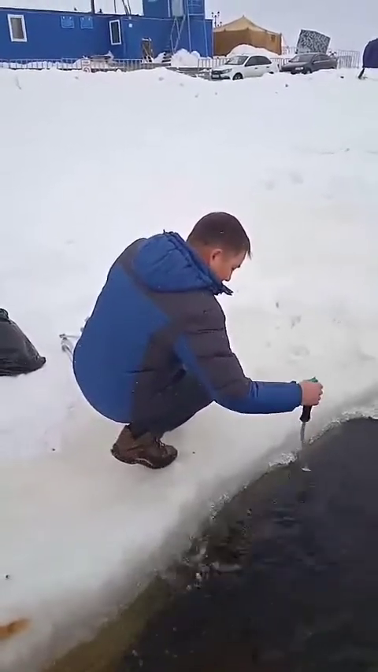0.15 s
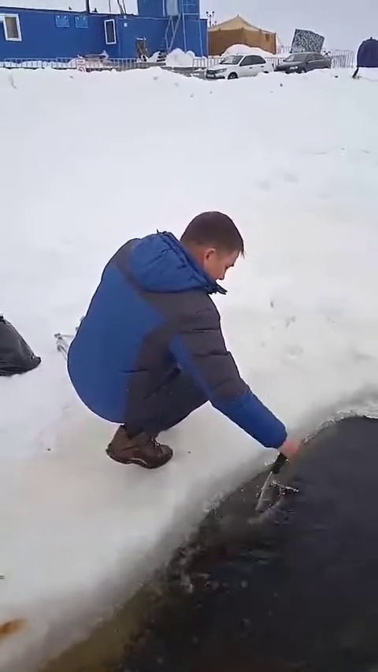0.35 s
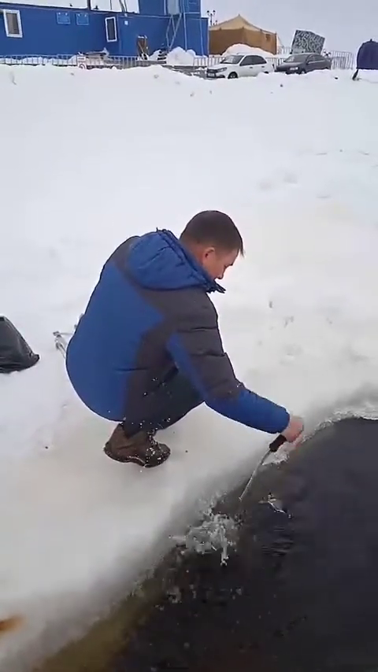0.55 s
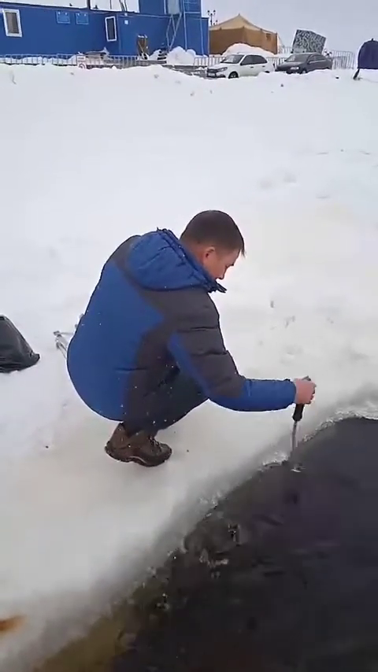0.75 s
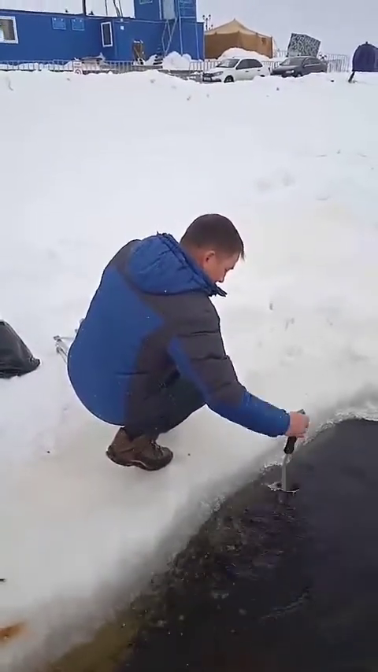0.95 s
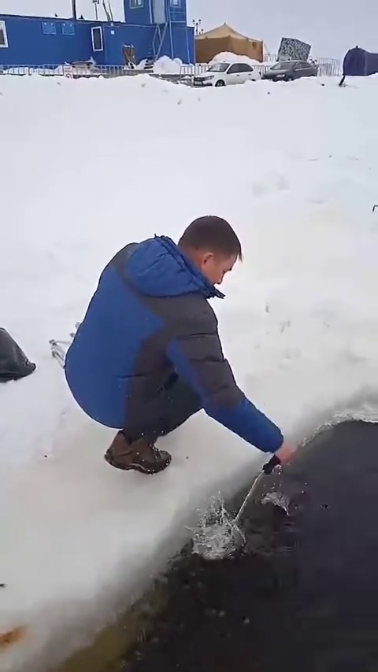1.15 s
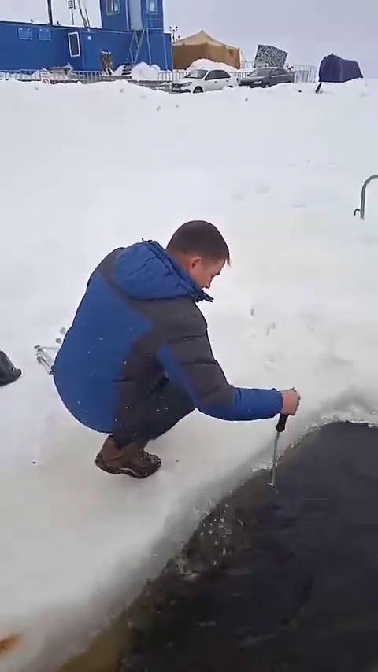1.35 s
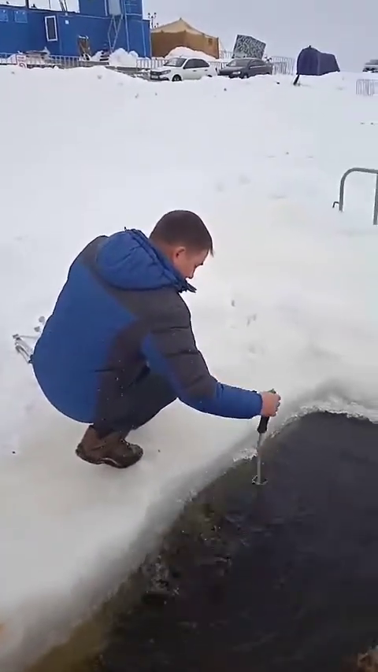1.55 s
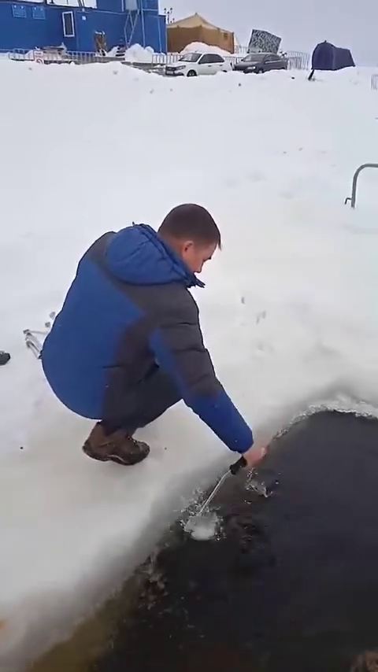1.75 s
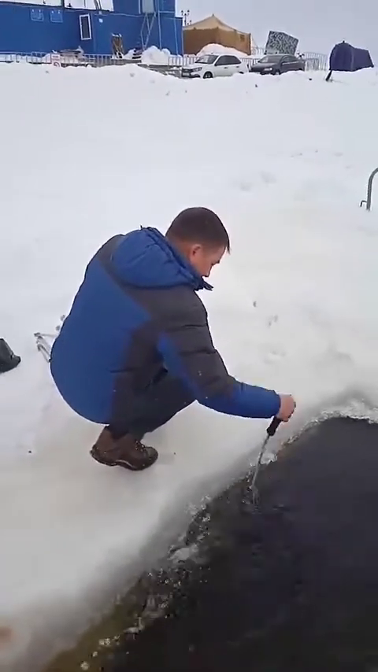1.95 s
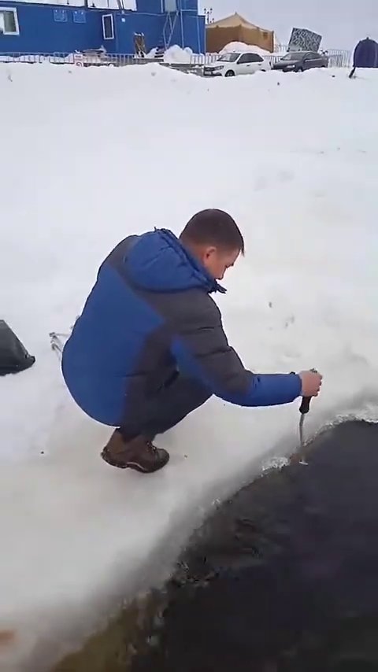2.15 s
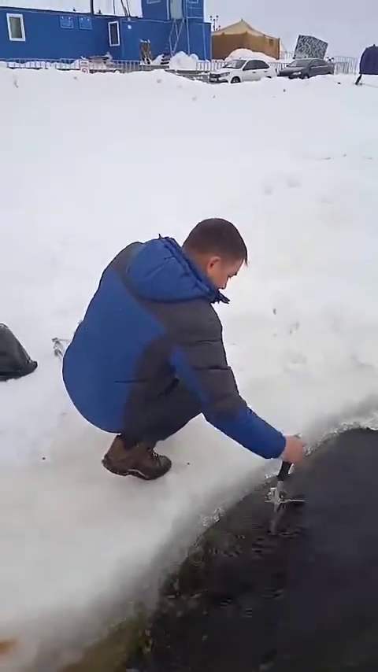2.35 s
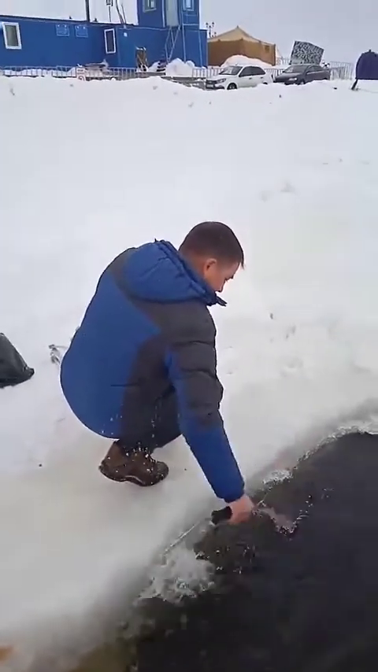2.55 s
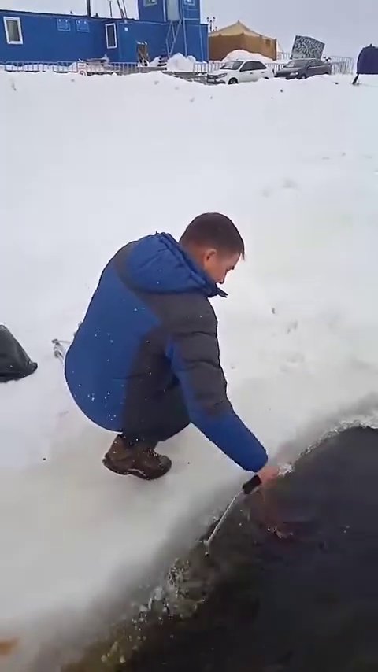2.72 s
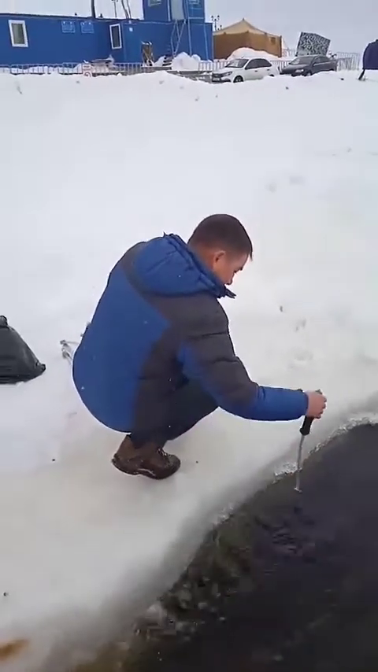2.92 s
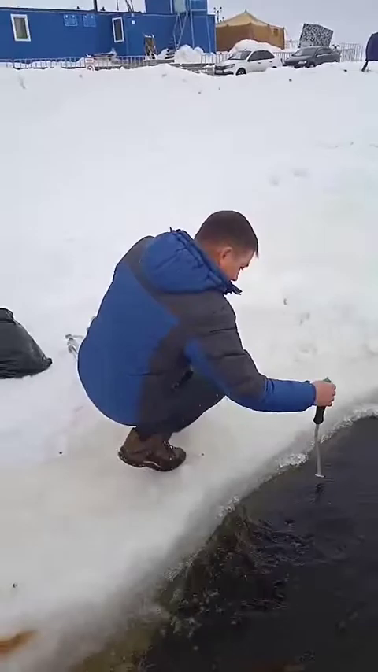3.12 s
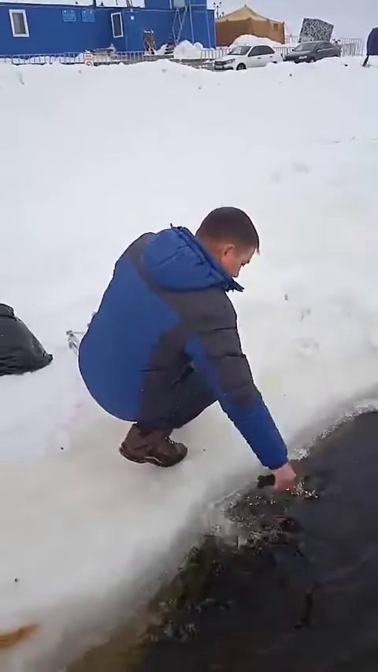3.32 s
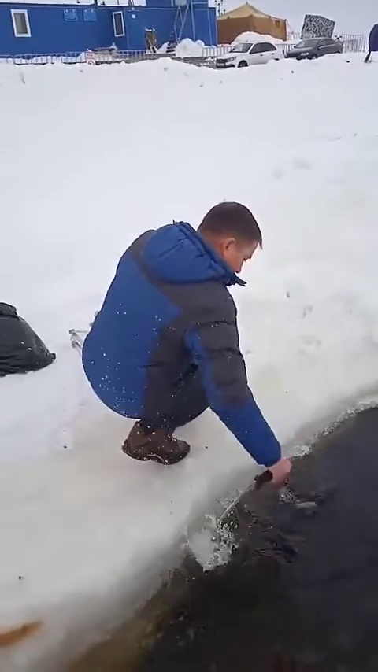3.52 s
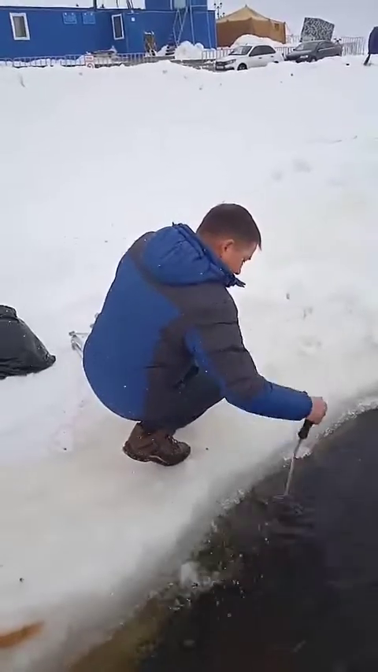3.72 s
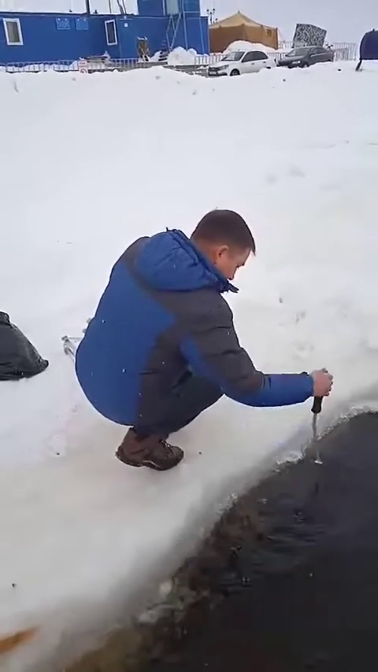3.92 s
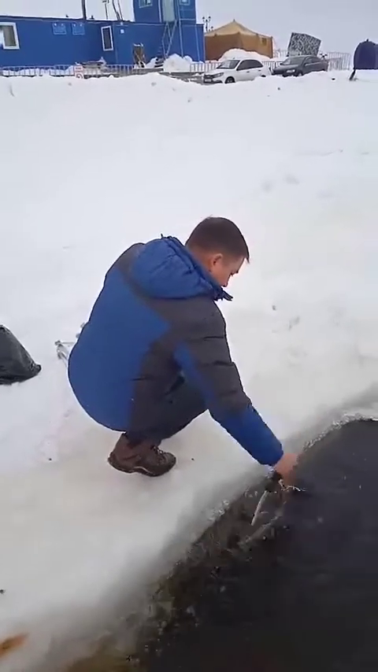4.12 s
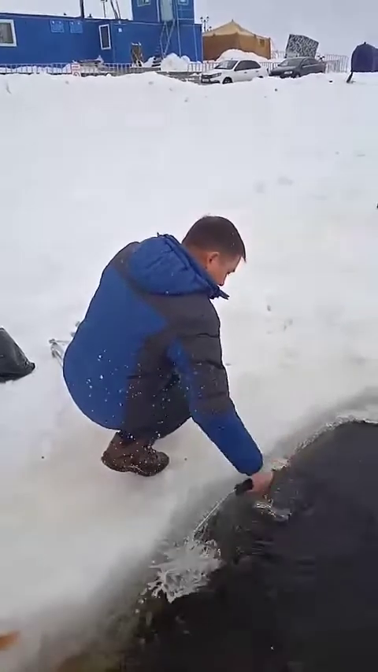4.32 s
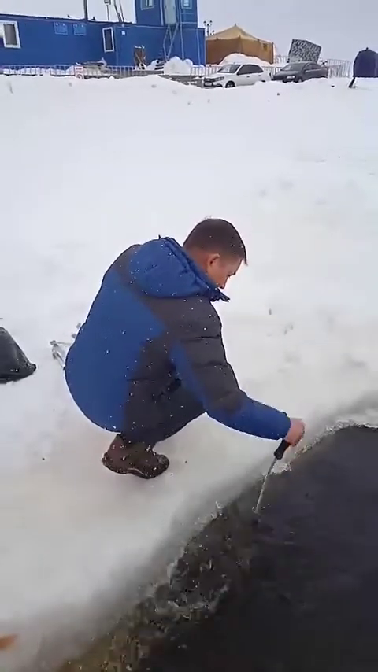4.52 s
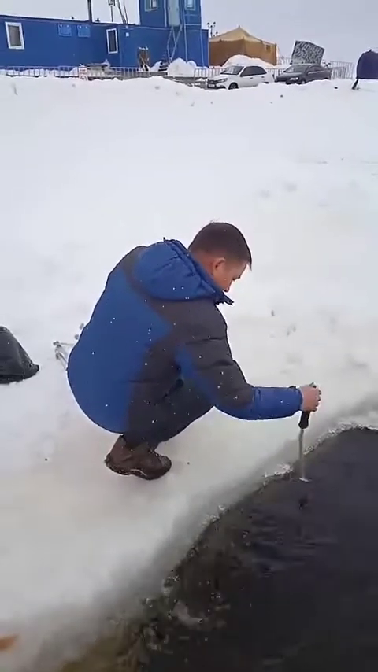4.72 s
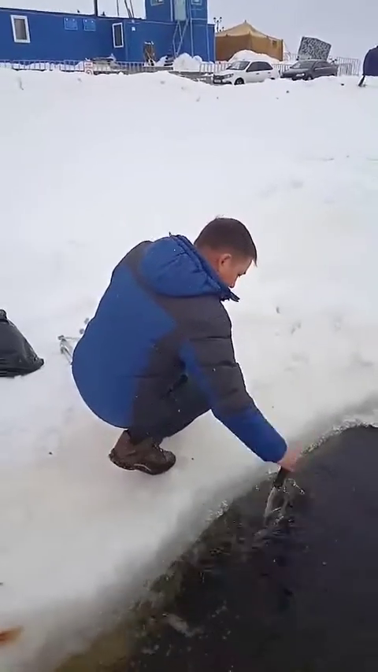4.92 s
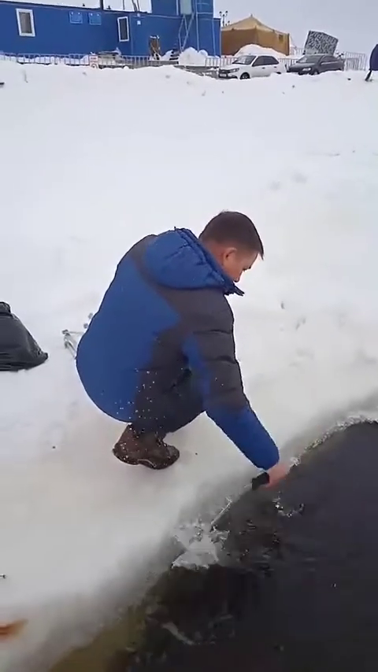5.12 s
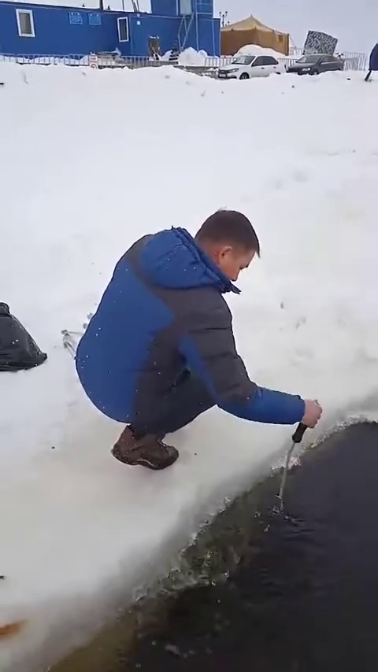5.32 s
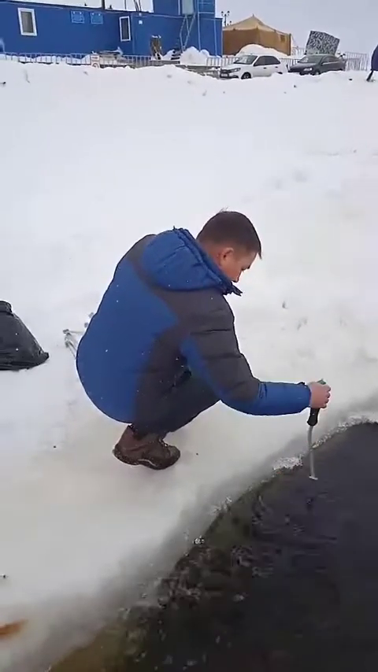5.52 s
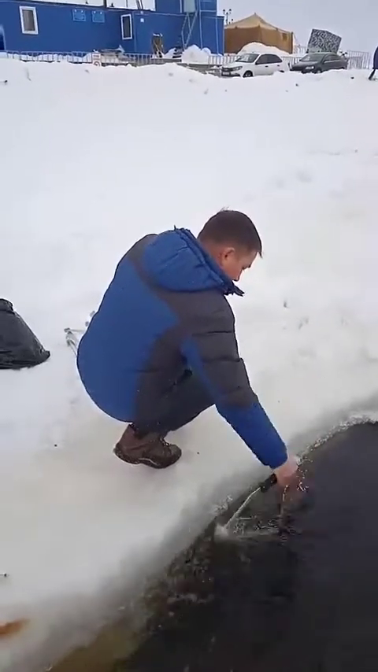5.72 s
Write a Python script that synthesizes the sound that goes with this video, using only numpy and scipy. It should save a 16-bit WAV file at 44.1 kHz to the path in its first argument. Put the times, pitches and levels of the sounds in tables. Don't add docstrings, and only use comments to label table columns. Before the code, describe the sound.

Outdoors by a snowy bank, a cupped metal rod sweeps through open water seven times, a little under a second apart. Each stroke gives a soft slap and a loud, short, hollow bloop that climbs in pitch, followed by light splash, hiss, drips and ticks on ice. A phone close by catches faint distant hum and wind puffs, ending in a buffeting gust.

```python
import sys
import numpy as np
from scipy import signal
from scipy.fft import rfft, irfft, next_fast_len
from scipy.io import wavfile

SR = 44100
rng = np.random.default_rng(int(sys.argv[2]) if len(sys.argv) > 2 else 0)


def wrap_up_sound(samples):
    columns = np.atleast_2d(samples).T
    tamed = np.clip(columns, -1, 1)
    steps = np.round(tamed * 32767).astype(np.int16)
    wavfile.write(sys.argv[1], SR, steps)


def convert_level_to_amplitude(level_db):
    exponent = np.asarray(level_db, float) / 20
    return 10 ** exponent


N = 254456


def rms_one(x):
    return x / np.sqrt(np.mean(x ** 2) + 1e-20)


def in_time(rows):
    s, level = np.transpose(rows)
    return np.interp(np.arange(N) / SR, s, level)


def add(out, s, piece):
    i = max(round(s * SR), 0)
    out[i:i + len(piece)] += piece[:N - i]


def colour(x, spectrum):
    hz, db = np.transpose(spectrum)
    size = next_fast_len(len(x))
    bins = np.arange(size // 2 + 1) * SR / size + 1
    gain_db = np.interp(np.log(bins), np.log(hz), db, left=-70, right=-70)
    return irfft(rfft(x, size) * convert_level_to_amplitude(gain_db), size)[:len(x)]


def drift(rate_hz):
    r = np.exp(-2 * np.pi * rate_hz / SR)
    slow = signal.lfilter([1], [1, -2 * r, r * r], rng.standard_normal(N + SR))
    return rms_one(slow[SR:])


def decay(t, t60):
    return convert_level_to_amplitude(-60 * t / t60)


def ring(t, hz, t60, rise=0.):
    return decay(t, t60) * np.sin(2 * np.pi * hz * t * (1 + rise * t / t60))


def soft_start(t, rise_s):
    return np.sin(np.pi / 2 * np.minimum(t / rise_s, 1)) ** 2


# (pinch-off [s], start [Hz], final [Hz], glide [s])
CAVITY_PITCH = [
    (0.4345, 138, 900, 0.0533),
    (1.0944, 134, 471, 0.0123),
    (1.7305, 112, 593, 0.0374),
    (2.4794, 87, 410, 0.0188),
    (3.3698, 151, 346, 0.006),
    (4.2083, 185, 738, 0.0547),
    (5.0195, 91, 683, 0.0397),
]
# (peak [dB], rise [s], hold [s], t60 [s])
CAVITY_SWELL = [
    (-8.2, .0148, .022, .02),
    (-12.1, .0044, .0164, .02),
    (-11.8, .0147, .0294, .0389),
    (-10.2, .006, .0072, .0895),
    (-10.4, .0026, .0166, .0327),
    (-8, .0038, .0239, .02),
    (-12.7, .0118, .02, .0299),
]
# (time [s], level [dB], pitch [Hz], t60 [s])
LAST_BUBBLES = [
    (.4616, -15, 462, .03),
    (1.1128, -23.3, 458, .045),
    (1.7688, -21.5, 475, .027),
    (2.514, -33, 372, .085),
    (3.3915, -26, 350, .12),
    (4.2361, -17.5, 404, .021),
    (5.0438, -22.3, 398, .046),
]


def cavity():
    out, t = np.zeros(N), np.arange(SR // 6) / SR
    knee_s = .003
    for (s, start_hz, final_hz, glide), (db, rise, hold, t60) in zip(CAVITY_PITCH, CAVITY_SWELL):
        turns = final_hz * t - (final_hz - start_hz) * glide * (1 - np.exp(-t / glide))
        fade_db = -60 * knee_s / t60 * np.logaddexp(0, (t - hold) / knee_s)
        add(out, s, -convert_level_to_amplitude(db + fade_db) * soft_start(t, rise) * np.sin(2 * np.pi * turns))
    for s, db, hz, t60 in LAST_BUBBLES:
        add(out, s, convert_level_to_amplitude(db) * ring(t, hz, t60) * soft_start(t, .005))
    return out


# (time [s], peak [dB], low push [dB], fine spray relative to coarse [dB])
SLAPS = [
    (0.4315, -34.5, -24, -4),
    (1.0849, -35, -19, -2),
    (1.729, -34.5, -18, 0),
    (2.4664, -30, -20.5, -6),
    (3.35, -33.5, -17, -1),
    (4.1977, -34.5, -25, -7.5),
    (5.0071, -31, -22, -3),
]


def slaps():
    out, coarse, fine = np.zeros((3, N))
    t = np.arange(SR // 4) / SR
    for s, db, push_db, fine_db in SLAPS:
        add(out, s, -convert_level_to_amplitude(push_db) * ring(t, 150, 0.023) * np.minimum(t / 0.001943, 1))
        burst = convert_level_to_amplitude(db - 11.5) * (decay(t, 0.019) + 0.3 * decay(t, 0.37)) * np.minimum(t / 0.0031, 1)
        add(coarse, s, burst)
        add(fine, s, convert_level_to_amplitude(fine_db) * burst)
    return out, coarse, fine


# (time [s], peak [dB], air column [Hz], its level [dB], fine spray relative to coarse [dB])
CLOSINGS = [
    (0.4414, -55.5, 894, -52, -10.5),
    (1.0967, -40, 876, -42.5, -10),
    (1.7328, -33.5, 857, -42.5, -16),
    (2.4818, -40, 677, -32.5, -2.5),
    (3.3632, -42, 753, -43, 0.5),
    (4.2085, -55, 798, -48.5, 5),
    (5.0218, -38, 738, -33.5, -5.5),
]
# (frequency ratio, level [dB], t60 [s])
AIR_MODES = [
    (0.998, 8.5, .06),
    (1.759, -3, .04),
    (2.499, -20.5, .035),
    (3.252, -22.5, .03),
]


def closings():
    out, coarse, fine = np.zeros((3, N))
    t = np.arange(SR // 4) / SR
    for s, db, hz, column_db, fine_db in CLOSINGS:
        for ratio, mode_db, t60 in AIR_MODES:
            add(out, s, convert_level_to_amplitude(column_db + mode_db) * ring(t, hz * ratio, t60, 0.048) * np.minimum(t / .004, 1))
        burst = convert_level_to_amplitude(db - 3.5) * (decay(t, 0.059) + 0.17 * decay(t, 0.17)) * np.minimum(t / 0.0017, 1)
        add(coarse, s, burst)
        add(fine, s, convert_level_to_amplitude(fine_db) * burst)
    return out, coarse, fine


# (time [s], peak [dB], spread [s], fine hiss relative to coarse [dB])
LANDINGS = [
    (.05, -72.5, 0.13, -2),
    (.7, -68.5, 0.084, -5),
    (1.35, -67, 0.11, -4.5),
    (1.712, -64, 0.025, -9),
    (1.99, -66, 0.14, -5),
    (2.78, -61, 0.12, -1),
    (3.69, -64, 0.1, -4),
    (4.48, -67.5, 0.11, -2),
    (5.34, -59, 0.071, -3.5),
]


def falling():
    t = np.arange(N) / SR
    coarse, fine = np.full(N, convert_level_to_amplitude(-80)), np.full(N, convert_level_to_amplitude(-81.5))
    for s, db, spread, fine_db in LANDINGS:
        runoff_starts = 1 / (1 + np.exp(np.minimum((s - t) / .02, 50)))
        draining = convert_level_to_amplitude(-13.5) * decay(np.abs(t - s), 1) * runoff_starts
        shower = convert_level_to_amplitude(db) * (np.exp(-((t - s) / spread) ** 2) + draining)
        coarse += shower
        fine += convert_level_to_amplitude(fine_db) * shower
    wake_s, edge_s = 0.073, 0.011
    for s, db, _, fine_db in SLAPS:
        wake = convert_level_to_amplitude(db - 35) * (t > s) / (1 + np.exp(np.minimum((t - s - wake_s) / edge_s, 50)))
        coarse += wake
        fine += convert_level_to_amplitude(fine_db - 1.5) * wake
    return coarse, fine


def patter(spectrum, low_hz, high_hz, per_s, cycles, grain_db, flicker_db):
    sizes = convert_level_to_amplitude(3.0 * np.minimum(rng.exponential(1, N), 4)) * rng.choice([-1, 1], N)
    born = rng.random(N) < per_s * convert_level_to_amplitude(5.0 * drift(15)) / SR
    dealt = np.where(born, rng.integers(0, 14, N), -1)
    white = rng.standard_normal((2, N))
    together, out = drift(34), 0
    for k, hz in enumerate(np.geomspace(low_hz, high_hz, 14)):
        w = 2 * np.pi * hz / SR
        bubble, strip = convert_level_to_amplitude(-60 * hz / (cycles * SR)), np.exp(-.1 * w)
        hits = sizes * (dealt == k) + 1e-18
        grains = signal.lfilter([np.sin(w)], [1, -2 * bubble * np.cos(w), bubble ** 2], hits)
        bed = signal.lfilter([1, 0, -1], [1, -2 * strip * np.cos(w), strip ** 2], white[k % 2])
        flicker = convert_level_to_amplitude(flicker_db * (.6 * together + 1.3 * drift(25)))
        out = out + np.sqrt(hz) * (rms_one(bed) * flicker + convert_level_to_amplitude(grain_db) * rms_one(grains))
    return rms_one(colour(out, spectrum))


# (frequency [Hz], level [dB per Hz])
SPLASH_SPECTRUM = [(530, -27), (900, -0.5), (1070, -15), (1220, -4), (1550, -2.5), (1880, -1), (2590, -3),
                   (3470, -15), (3900, -17), (5070, -40.5), (8580, -120)]
# (frequency [Hz], level [dB per Hz])
HISS_SPECTRUM = [(2180, -49), (3700, -52), (4110, -6.5), (5370, -3.5), (6710, -3.5), (9150, -25.5),
                 (10200, -16.5), (13500, -24.5), (15100, -5.5), (15900, -10), (16300, -27.5)]


def spray(thrown_coarse, thrown_fine):
    falling_coarse, falling_fine = falling()
    coarse = patter(SPLASH_SPECTRUM, 1000, 3800, per_s=110, cycles=30, grain_db=4, flicker_db=3)
    fine = patter(HISS_SPECTRUM, 3700, 16000, per_s=220, cycles=45, grain_db=3, flicker_db=3)
    droplets = (rng.random(N) < 70 / SR) * convert_level_to_amplitude(4 * np.minimum(rng.exponential(1, N), 3))
    spatter = signal.lfilter([1], [1, -decay(1 / SR, .006)], droplets) * rng.standard_normal(N)
    fine = fine + convert_level_to_amplitude(-7) * rms_one(colour(spatter, HISS_SPECTRUM))
    coarse_level = falling_coarse + thrown_coarse * convert_level_to_amplitude(0.83 * drift(300))
    fine_level = falling_fine + thrown_fine * convert_level_to_amplitude(1.1 * drift(200))
    return coarse_level * coarse + fine_level * fine


# (time [s], peak [dB], bubble [Hz])
DRIPS = [(0.5664, -53, 2630), (0.6487, -40.5, 1430), (0.713, -50, 1760), (0.7287, -48.5, 2730),
         (1.3735, -44, 1770), (1.3935, -48, 2000), (1.4184, -47, 2110), (1.665, -52.5, 1315),
         (2.0363, -51.5, 2050), (2.0566, -49, 2130), (2.7725, -44.5, 2410), (2.8602, -42, 1370),
         (3.611, -53, 1270), (3.619, -49, 345), (3.628, -50.5, 854), (3.674, -52, 385), (1.6645, -53, 2400),
         (3.7013, -37.5, 1830), (3.7529, -52, 1770), (3.8102, -46.5, 2600), (4.365, -49, 1800),
         (4.4303, -50, 2420), (4.478, -49, 1320), (4.503, -42.5, 2600), (4.6226, -55.5, 1190),
         (5.1762, -45, 3040), (5.281, -56, 2430), (5.499, -56, 2010)]


def drips():
    out, t = np.zeros(N), np.arange(SR // 16) / SR
    for s, db, hz in DRIPS:
        bubble = ring(t, hz, min(55.0 / hz, .09), 0.017)
        add(out, s, convert_level_to_amplitude(db - 0.5) * bubble * np.minimum(t / 0.00075, 1))
    return out


# (time [s], peak [dB], centre [Hz])
TICKS = [(0.1483, -43, 4070), (0.2924, -43.5, 6260), (0.614, -44, 16100), (0.6477, -46, 5500),
         (0.7578, -45.5, 4500), (0.842, -48.5, 5480), (1.2514, -48, 5430), (1.4318, -38, 5220),
         (1.6541, -43.5, 4350), (1.6904, -45, 6400), (1.7207, -41, 6040), (1.8994, -42, 6500),
         (2.119, -40.5, 5940), (2.772, -44.5, 15300), (2.9718, -38.5, 5800), (3.4505, -46, 15100),
         (3.5706, -47, 5400), (3.6723, -36.5, 5360), (3.7528, -43, 5100), (3.8137, -36, 4270),
         (4.0303, -47, 6070), (4.0718, -48.5, 6900), (4.145, -51.5, 6200), (4.504, -40.5, 4730),
         (4.541, -40.5, 6250), (4.593, -36, 4440), (4.7657, -50, 6000), (5.1815, -41, 5700),
         (5.354, -35.5, 5200), (5.647, -39, 5600)]


def ticks():
    out, t = np.zeros(N), np.arange(SR // 16) / SR
    when, size, pitch = rng.random(size=(26, 3)).T
    strays = zip(when * N / SR, -62 + 9 * size, 4500 + 4500 * pitch)
    for s, db, hz in [*TICKS, *strays]:
        band = signal.butter(3, [hz * .8, min(hz * 1.22, 16200)], "band", fs=SR, output="sos")
        noise = rms_one(signal.sosfilt(band, rng.standard_normal(len(t))))
        add(out, s, convert_level_to_amplitude(db - 5) * noise * decay(t, .012) * np.minimum(t / .001, 1))
    return out


def eddies(rows, cycles):
    out, t = np.zeros(N), np.arange(-SR // 25, SR // 25) / SR
    for s, db, hz in rows:
        band = signal.butter(3, [hz * .5, hz * 1.37], "band", fs=SR, output="sos")
        eddy = signal.sosfilt(band, rng.standard_normal(len(t)))
        burst = eddy * np.exp(-(t * hz / cycles) ** 2)
        add(out, s + t[0] - .001, convert_level_to_amplitude(db) * burst / np.abs(burst).max())
    return signal.sosfilt(signal.butter(4, 420, fs=SR, output="sos"), out)


# (time [s], peak [dB])
SNAPS = [(1.665, -50), (4.518, -43), (4.601, -41.5), (4.876, -48), (4.954, -58), (4.979, -50), (5.108, -39),
         (5.14, -30), (5.349, -40), (5.395, -45), (5.432, -32), (5.616, -51), (5.696, -48), (5.729, -37)]


def snaps():
    out, t = np.zeros(N), np.arange(-SR // 25, SR // 25) / SR
    lowpass = signal.butter(3, 650, fs=SR, output="sos")
    for s, db in SNAPS:
        dull = signal.sosfilt(lowpass, rng.standard_normal(len(t)) * np.exp(-((t - .002) / 0.0027) ** 2))
        add(out, s + t[0], convert_level_to_amplitude(db + 4) * dull / np.abs(dull).max())
    return out


# (time [s], peak [dB], pitch [Hz])
PUFFS = [(0.025, -46.5, 87), (0.224, -45, 106.5), (0.293, -46.5, 142), (0.723, -47.5, 122),
         (1.002, -39, 189), (1.05, -36.5, 129), (1.41, -44.5, 157), (1.52, -37, 228), (1.585, -44.5, 169),
         (1.67, -31.5, 130.6), (2.157, -47.5, 121), (2.313, -35, 102), (2.414, -32.5, 163),
         (2.456, -39, 174), (2.753, -37.5, 138), (2.852, -48.5, 130), (2.955, -49, 106), (3.021, -33, 109),
         (3.164, -34.5, 94), (3.256, -40, 133), (3.442, -26.5, 139), (3.541, -40, 120), (3.672, -45, 146),
         (3.783, -43, 99), (3.853, -33.5, 138), (3.902, -34, 139), (3.94, -29, 163), (4.054, -36, 200),
         (4.261, -35.5, 130), (4.365, -31, 167)]
# (time [s], peak [dB], pitch [Hz])
BUFFETS = [(4.431, -37.5, 120), (4.52, -26, 179), (4.579, -23, 168), (4.603, -26.5, 186),
           (4.677, -33.5, 144), (4.701, -37.5, 230), (4.76, -36, 132), (4.803, -25, 119), (4.834, -28, 164),
           (4.88, -28.5, 153), (4.956, -30, 234), (4.986, -19, 194), (5.112, -21.5, 240),
           (5.149, -22.5, 203), (5.226, -23.5, 188), (5.254, -27, 200), (5.303, -24.5, 196),
           (5.355, -24, 274), (5.396, -27, 232), (5.442, -21, 205), (5.464, -27.5, 136), (5.499, -22, 180),
           (5.604, -29.5, 203), (5.692, -27, 174), (5.729, -16.5, 215), (5.752, -33, 167),
           (5.078, -39, 164), (5.184, -38, 165), (5.622, -33, 292), (5.657, -36, 173)]
# (time [s], level [dB])
WIND_LEVEL = [(0.0, -60), (.45, -67.5), (.75, -56), (.9, -70), (1.08, -42.5), (1.3, -68), (1.72, -52),
              (1.92, -69.5), (2.42, -47.5), (2.75, -60), (3.1, -58), (3.42, -51.5), (3.78, -55), (4.4, -45),
              (4.85, -40.5), (5.45, -37), (5.58, -51.5), (5.77, -27.5)]
# (frequency [Hz], level [dB per Hz])
RUMBLE_SPECTRUM = [(20, -6), (40, 1), (70, 2), (110, 0), (160, -9), (230, -26), (400, -45)]
# (frequency [Hz], level [dB per Hz])
FLUTTER_SPECTRUM = [(90, -22.5), (180, 0.5), (300, -5), (500, -12.5), (900, -37)]


def wind():
    bursts = eddies(PUFFS, cycles=1.77) + eddies(BUFFETS, cycles=1) + snaps()
    wind_db, lumps = in_time(WIND_LEVEL), drift(23)
    rumble = rms_one(colour(rng.standard_normal(N), RUMBLE_SPECTRUM))
    flutter = rms_one(colour(rng.standard_normal(N), FLUTTER_SPECTRUM))
    flutter_db = 1.39 * (wind_db + 37.5) - 46.5 + 6.6 * lumps
    return bursts + rumble * convert_level_to_amplitude(wind_db - 0.5 + 3.2 * lumps) + flutter * convert_level_to_amplitude(flutter_db)


# (time [s], level [dB])
LOAD = [(0.0, -90), (.6, -77), (1.6, -76), (1.9, -70.5), (2.5, -60), (3.19, -62), (3.26, -96), (3.55, -90),
        (4.05, -72.5), (4.77, -70), (5.2, -92), (5.77, -82)]
# (frequency [Hz], level [dB per Hz])
HUM_SPECTRUM = [(150, -30), (280, -11), (420, -4), (640, 0), (900, -6), (1100, -10), (1350, 0), (1650, -5),
                (1900, -20), (2700, -26), (3400, -50)]


def far_hum():
    whine_db = in_time(LOAD)
    drone_db = -71 + .05 * (whine_db + 71.5) + 1.5 * drift(7.5)
    far = colour(rng.standard_normal(N), HUM_SPECTRUM)
    split_hz = 1050
    drone = signal.sosfilt(signal.butter(4, split_hz, fs=SR, output="sos"), far)
    whine = signal.sosfilt(signal.butter(4, split_hz, "high", fs=SR, output="sos"), far)
    return convert_level_to_amplitude(drone_db) * rms_one(drone) + convert_level_to_amplitude(whine_db - 9.5) * rms_one(whine)


def scene():
    slap, slap_coarse, slap_fine = slaps()
    closing, closing_coarse, closing_fine = closings()
    water = cavity() + slap + closing + spray(slap_coarse + closing_coarse, slap_fine + closing_fine)
    return (water + drips() + ticks() + wind() + far_hum())[None]


def low_pass(x):
    return signal.sosfilt(signal.butter(12, 16970, fs=SR, output="sos"), x)


def record(dry):
    vented = signal.sosfilt(signal.butter(3, 75, "high", fs=SR, output="sos"), dry)
    closing = np.minimum(np.arange(N, 0, -1) / 200, 1)
    return low_pass(vented * closing)


dry = scene()
out = record(dry)
wrap_up_sound(out)
```